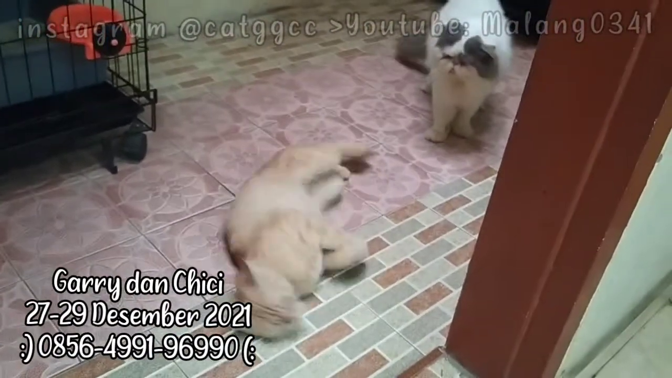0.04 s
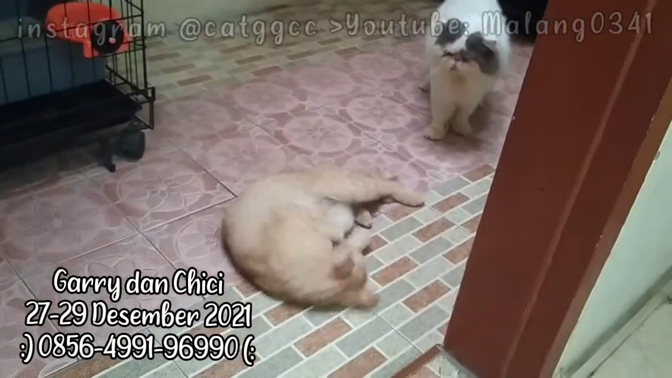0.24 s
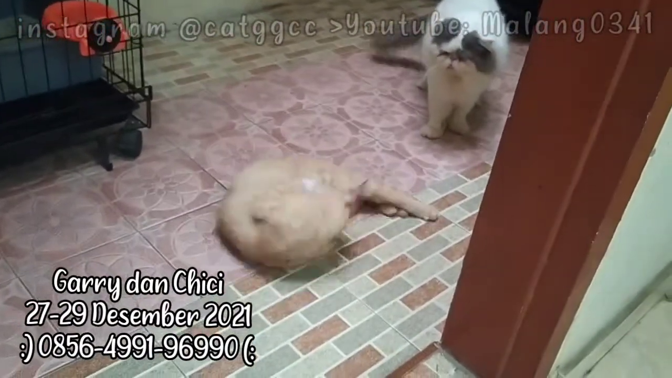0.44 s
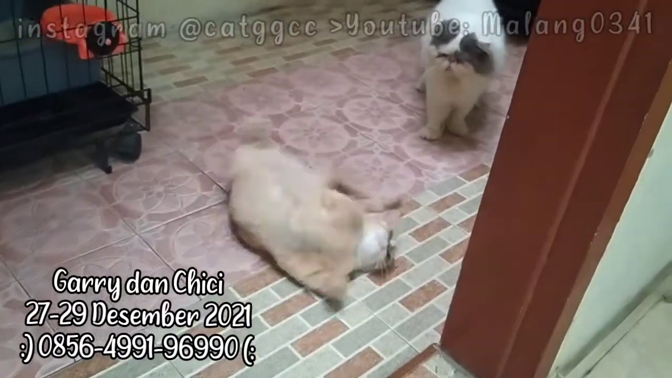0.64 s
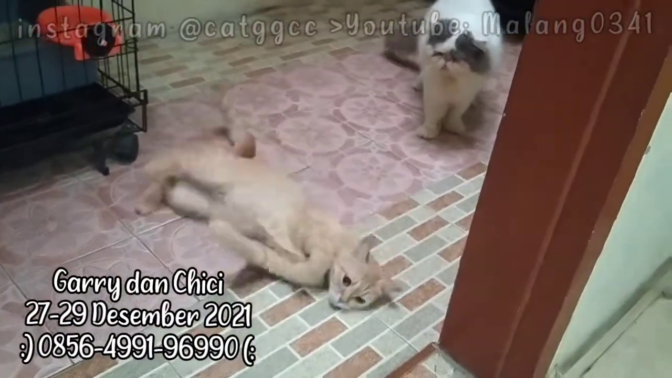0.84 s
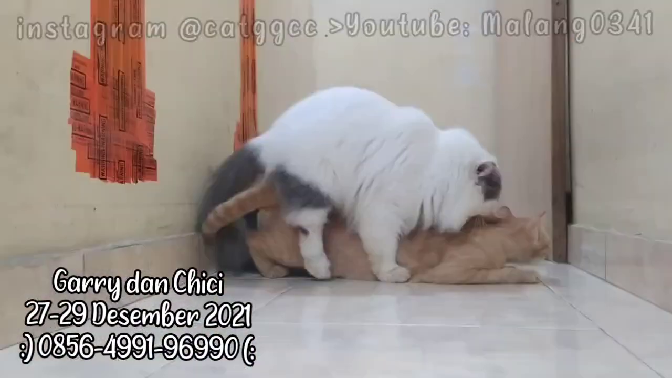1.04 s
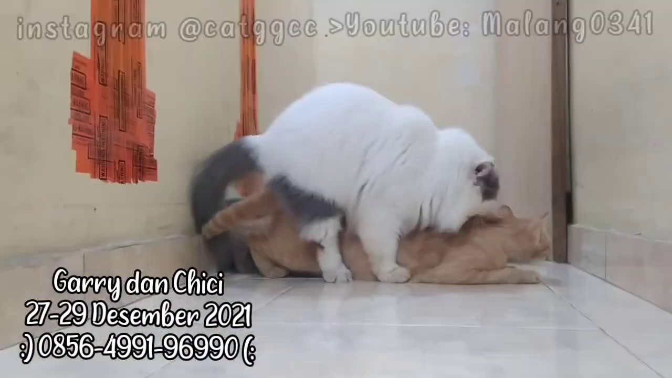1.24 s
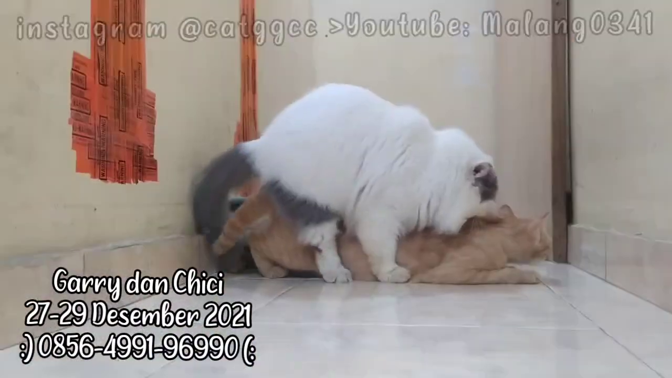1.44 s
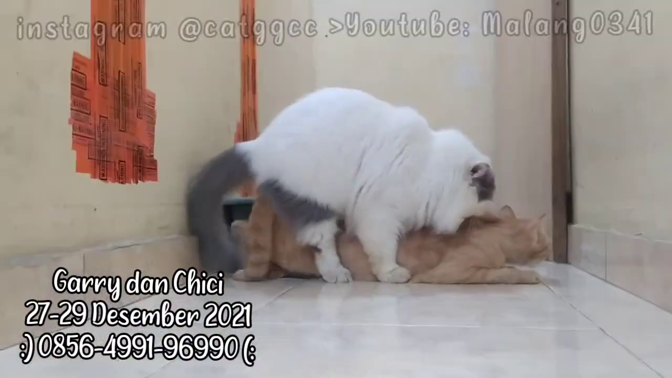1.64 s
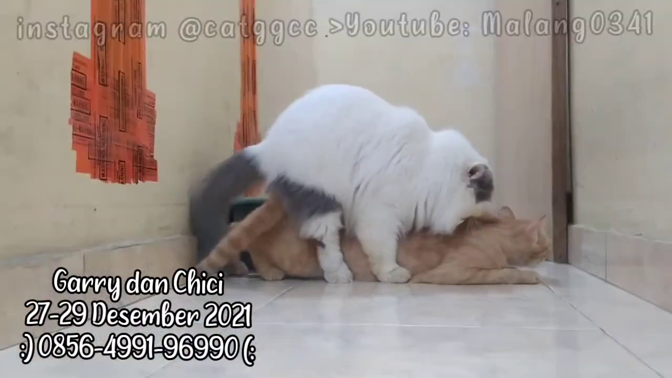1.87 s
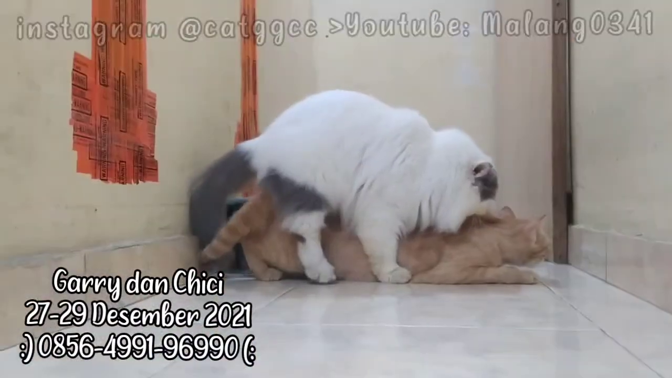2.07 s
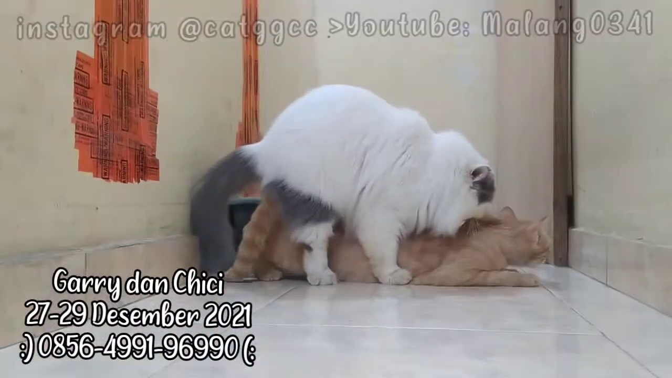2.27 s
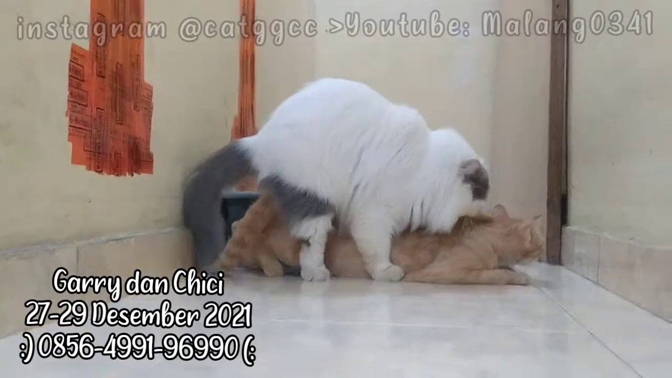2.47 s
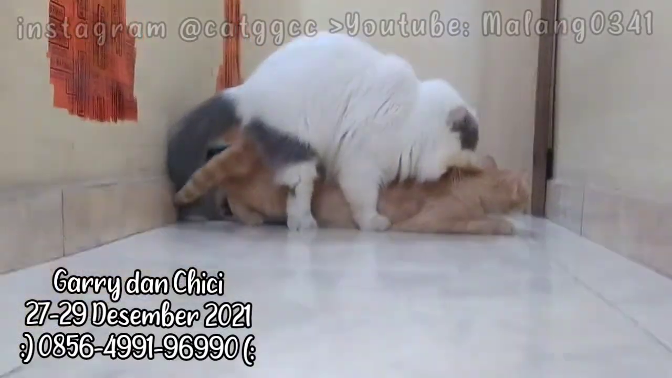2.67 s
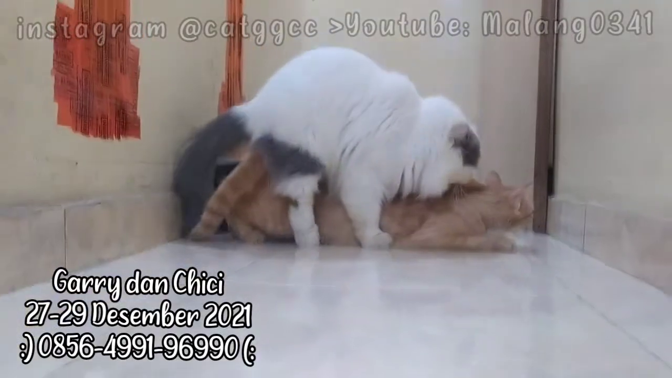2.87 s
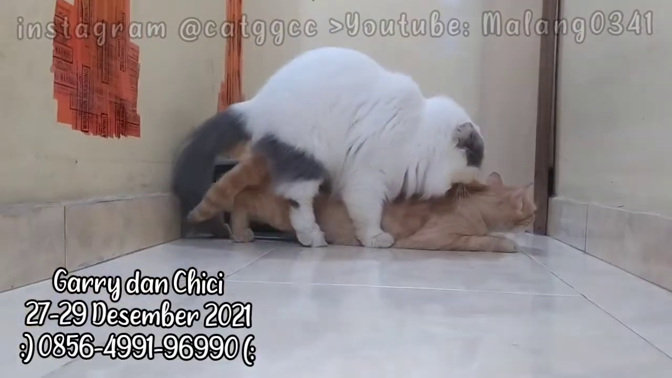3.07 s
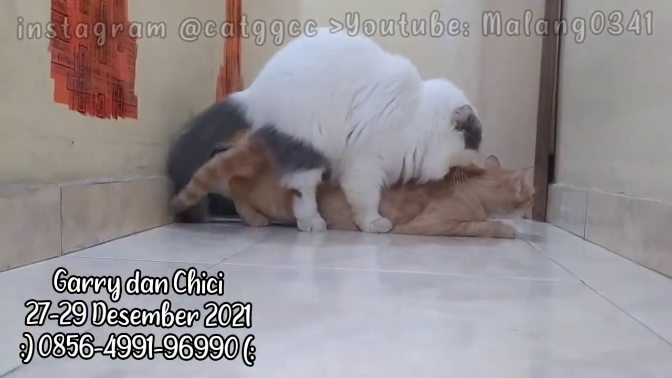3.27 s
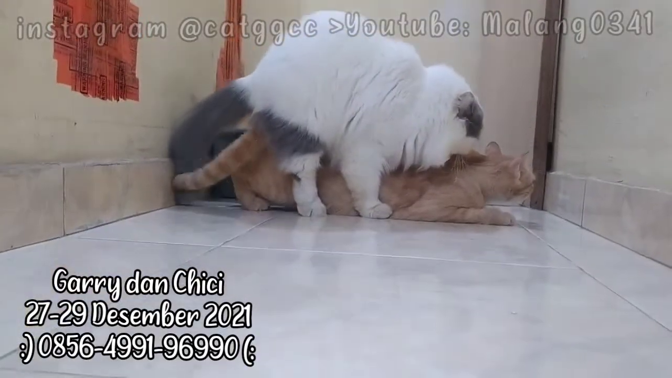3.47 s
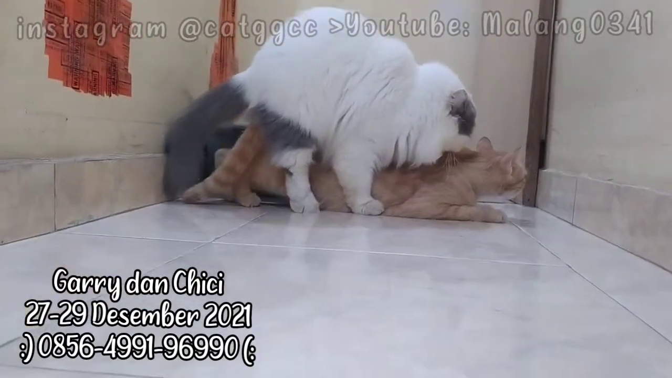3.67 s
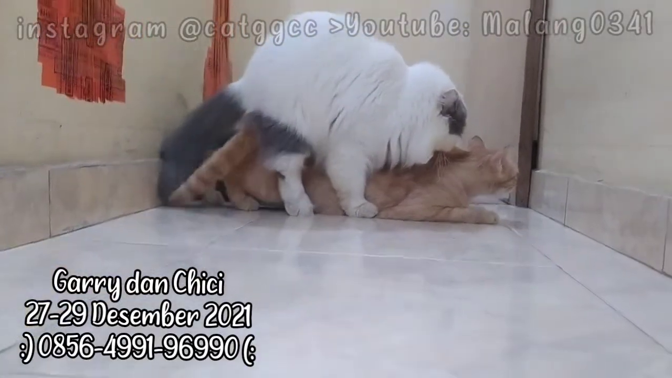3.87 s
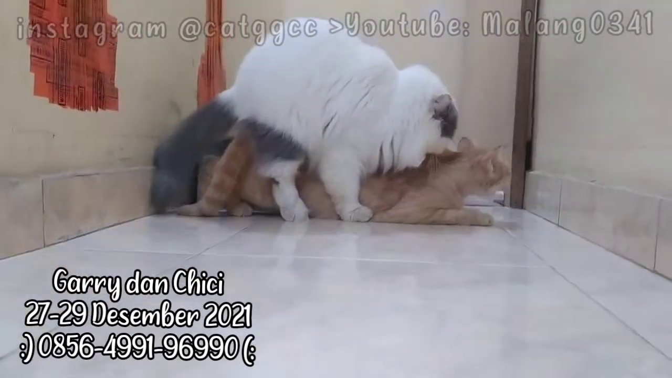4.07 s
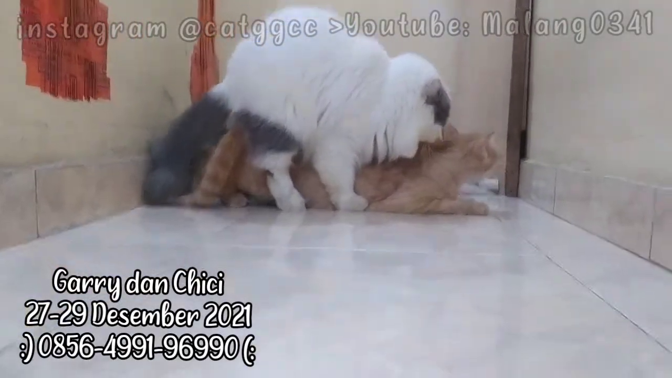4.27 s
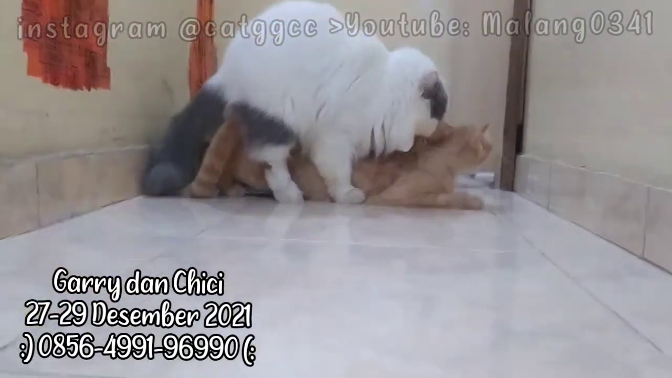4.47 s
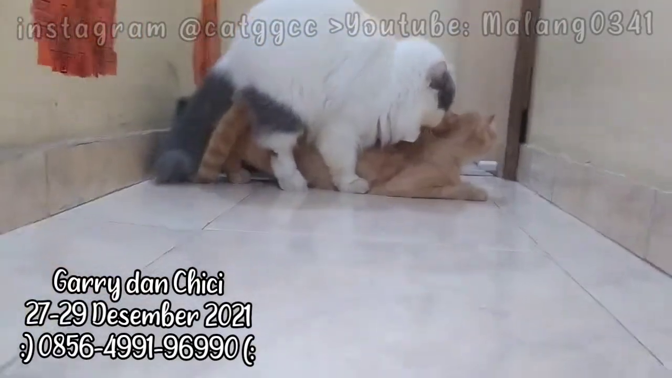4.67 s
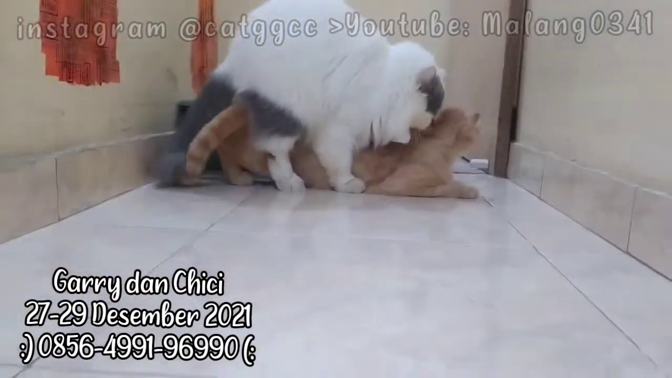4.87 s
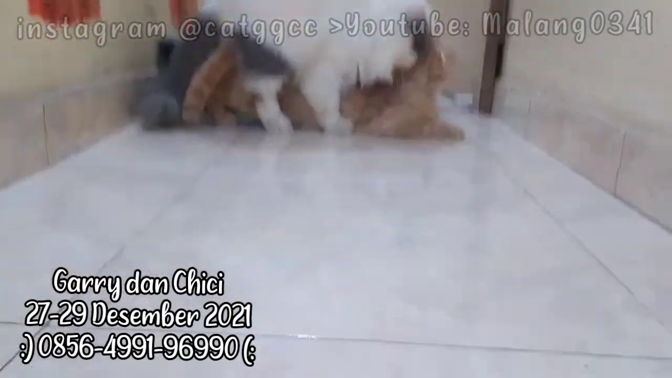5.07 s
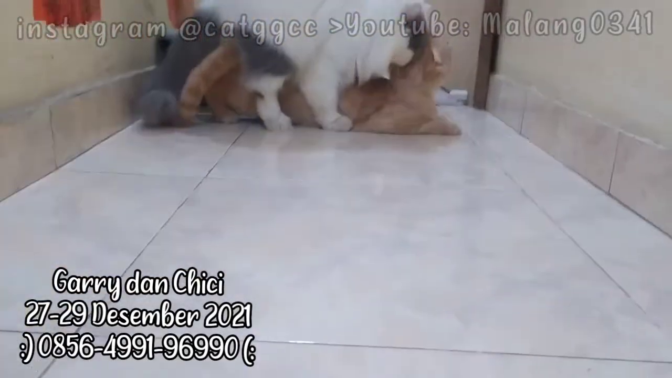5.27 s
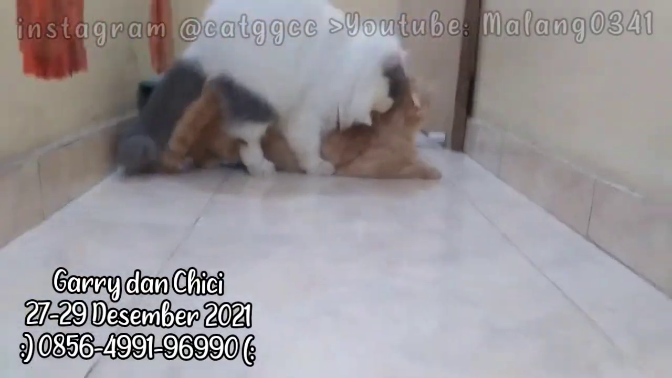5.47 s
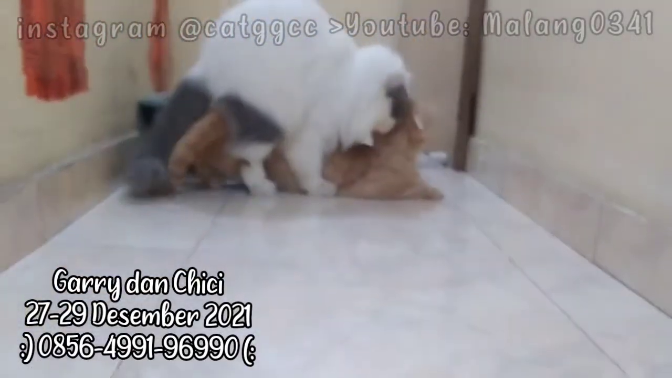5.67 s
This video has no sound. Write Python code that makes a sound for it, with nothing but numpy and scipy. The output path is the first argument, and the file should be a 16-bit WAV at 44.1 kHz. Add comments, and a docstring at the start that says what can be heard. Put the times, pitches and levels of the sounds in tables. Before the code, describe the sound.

From 0 to 0.87 s, a distant wavering low drone fills a room, with soft fur brushes of a cat rolling on the floor and a thin, far mew around 0.1-0.4 s. The sound dips almost to silence, then cuts to a quieter tiled corner. At 0.9 s comes a short, rough growl fading by 1.2 s, with faint claw ticks. From 1.7 to 3.7 s a low, closed-mouth moan wavers, quickening slightly, sinking in pitch and breaking into gravelly roughness before fading; a sharper claw tick lands near 2.4 s. Fur scuffs and ticks increase from 3.2 s, with a dull soft floor bump near 3.7 s. At 4.0 s a scream starts noisy and tight, swoops up over half a second as the mouth opens, and holds very loud, harsh and two-toned, quavering early, until the cut at about 5.7 s. Close walls echo brightly.

```python
"""A cat pinned by another in a tiled corner: a short growl, a long low moan, then a loud scream.
The moan is soft fold pulses that keep breaking into roughness; the scream is two coupled, rasping
oscillators. Both pass moving throat filters and reach the two microphones with close wall echoes.
Filtered noise makes fur and claws scuffing on tile, and dull floor bumps. It opens in another room,
with a distant drone, a thin far mew and a cat rolling on the floor; the level dips, then the corner."""
import sys
import numpy as np
from scipy import signal
from scipy.fft import rfft, irfft, next_fast_len
from scipy.io import wavfile
from scipy.ndimage import uniform_filter1d, map_coordinates

SR = 44100
rng = np.random.default_rng(int(sys.argv[2]) if len(sys.argv) > 2 else 0)


def wav_record(signal):
    """Record a signal, one row per channel, as 16-bit PCM in the file named by sys.argv[1]."""
    frames = np.transpose(np.atleast_2d(signal))
    bounded = np.clip(frames, -1, 1)
    # unit amplitude maps onto the largest positive 16-bit level
    quanta = np.round(bounded * 32767).astype(np.int16)
    wavfile.write(sys.argv[1], SR, quanta)


N = 252252
TIME = np.arange(N) / SR


def gain_of(db):
    """Decibels to gain."""
    return 10 ** (np.asarray(db) / 20)


def evened(x):
    """Scales to rms 1."""
    return x / np.sqrt(np.mean(x ** 2) + 1e-20)


def read(points, hz):
    """Reads a spectrum on a log-frequency axis."""
    f, value = np.transpose(points)
    return np.interp(np.log(hz + 1), np.log(f + 1), value)


def follow(rows, t):
    """Reads every column of a curve at the times t."""
    s, *columns = np.transpose(rows)
    return [np.interp(t, s, c) for c in columns]


def add(mix, s, sound):
    """Mixes a sound in at time s."""
    part = mix[max(round(s * SR), 0):][:len(sound)]
    part += sound[:len(part)]


def colour(x, points):
    """Filters by a fixed spectrum."""
    length = x.shape[-1]
    size = next_fast_len(length + SR // 2)
    gain = gain_of(read(points, np.fft.rfftfreq(size, 1 / SR)))
    return irfft(rfft(x, size) * gain, size)[..., :length]


def wobble(t, rate_hz):
    """Random motion of rms 1 that weakens above the rate."""
    hz = np.fft.rfftfreq(N, 1 / SR)
    slowed = rfft(rng.standard_normal(N)) / np.hypot(1, (hz / rate_hz) ** 2)
    return evened(irfft(slowed)[:len(t)])


def cycles(t, hz, jitter, jitter_hz):
    """Phase of an oscillator whose period is unsteady."""
    return 2 * np.pi * np.cumsum(hz * (1 + jitter * wobble(t, jitter_hz))) / SR


def pulses(phase, count):
    """One sharp pulse a cycle, from equal harmonics."""
    return evened(sum(np.cos(k * phase) for k in range(1, count + 1)))


def throat(drive, t, shape):
    """Filters by a moving spectrum shape(Hz, s) in dB and holds the result at unit level."""
    hz, s, z = signal.stft(drive, SR, nperseg=1024, noverlap=768)
    shaped = z * gain_of(shape(hz[:, None], s + t[0]))
    x = signal.istft(shaped, SR, nperseg=1024, noverlap=768)[1][:len(t)]
    return x / np.sqrt(abs(uniform_filter1d(x ** 2, size=2600)) + 1e-12)


# The scream's slow course, under its quaver.
# Each row: time in seconds, main pitch in Hz, second oscillator in Hz.
SCREAM_COURSE = [(4.0, 411.8, 250.7), (4.13, 488.3, 305), (4.22, 600, 382.4), (4.35, 741.6, 450),
                 (4.52, 793.9, 463.7), (4.93, 770.8, 473.1), (5.3, 845.7, 468.7), (5.44, 787.5, 471)]
# The mouth and the two throat resonances it moves. Each row: time in seconds, opening 0-1,
# lower resonance in Hz, its height in dB, upper resonance in Hz, its height in dB.
MOUTH_COURSE = [(3.99, 0, 1000, 7, 2500, -9), (4.03, 0.04, 1324, 14.5, 2430, -2),
                (4.13, 0.02, 1510, 13, 2430, 12), (4.2, 0.6, 1830, 8.5, 2560, 7.5),
                (4.28, 0.73, 1850, 6, 2370, 7), (4.42, 0.92, 2040, 9.5, 2340, -5.5),
                (4.59, 0.9, 1850, 3, 2160, 6.5), (4.85, 0.92, 1850, 8.5, 2250, -1),
                (5.06, 0.88, 1510, 4.5, 2524, 6), (5.24, 1, 1860, -6.5, 2370, 6.5),
                (5.42, 0.97, 1790, 4, 2200, 4.5), (5.58, 0.99, 1845, 4.5, 2720, 7),
                (5.72, 0.96, 1930, 3.5, 2670, 4)]
# Throat with the mouth just parted. Each row: frequency in Hz, level in dB.
PARTED_SPECTRUM = [(100, -22), (190, 0.5), (290, 3.5), (480, -10), (850, 3), (1400, -3), (2000, -15),
                   (2900, -14), (3250, -57), (14000, -76)]
# Throat with the mouth wide open. Each row: frequency in Hz, level in dB.
OPEN_SPECTRUM = [(150, -11), (230, -39.5), (450, -21.5), (830, -16), (1330, -10), (1520, -9), (1750, -1.5),
                 (2050, -1), (2450, -6.5), (2850, -9.5), (3200, -17.5), (3650, -21.5), (4600, -31.5),
                 (7800, -29.5), (10200, -20.5), (11200, -34), (13500, -43.5), (15500, -82)]
# The sum tone, as the oscillators lock for a moment. Each row: time in seconds, level in dB.
SUM_TONE_COURSE = [(4.95, -14.5), (5.28, -6.5), (5.4, -19)]
# Surges of the lower oscillator that rob the main one of its clear tone: times in seconds.
SURGE_TIMES = [4.55, 4.79, 4.96, 5.06, 5.37, 5.57]
# half length of a surge, lift of the lower tone, dip of the main one
SURGE_S, SURGE_DB, ROBBED_DB = 0.047, 9.5, -7.5
SCREAM_START_S, SCREAM_ATTACK_S = 3.994, 0.032
FIRM_S = 0.355  # time the scream takes to firm up from its noisy start
COUPLE_S = 0.48  # time until the slower oscillator fully chops the main one
TEAR_DB = 2.6  # rms depth, mouth fully open, at which partials flare and drop out
STRETCH = 0.57  # resonances below 6 kHz shift upward (octaves per full opening)
REST_OPENING = .92  # the opening at which they are unshifted


def scream(jitter=.06, second_jitter=.08, start_jitter=.02, coupling=1.0, second_db=-10, air_db=-7,
           rasp=0.26, rasp_hz=90, main_db=-9.5, low_db=-27.0, width_hz=150):
    """Two oscillators: the slower chops the main pulses into sum and difference tones, with a rasp."""
    t = np.arange(SCREAM_START_S, N / SR, 1 / SR)
    age = t - t[0]
    hz, second_hz, rough, gain = scream_effort(t)
    coupled = np.minimum(age / COUPLE_S, 1) ** 4
    stumble = start_jitter * np.maximum(1 - age / FIRM_S, 0)
    main = cycles(t, hz, jitter * rough + stumble, jitter_hz=109.6)
    second = cycles(t, second_hz, second_jitter * rough + stumble, jitter_hz=108.5)

    overtones = pulses(second, count=20) - np.cos(second) / np.sqrt(10)  # without its fundamental
    chopped = pulses(main, count=14) * (1 + coupling * coupled * np.cos(second))
    folds = chopped + gain_of(second_db) * overtones
    # turbulence leaves in puffs, one a cycle, and is stronger in the treble
    puffs = rng.standard_normal(len(t)) * (1 + np.cos(second))
    air = colour(puffs, [(1000, 0.0), (2000, 14.0)])
    drive = (folds + gain_of(air_db) * rough * air) * np.exp(rasp * rough * wobble(t, rasp_hz))

    def shape(f, s):
        """Two resonances move with jaw and tongue over a throat that brightens as it opens; the rasp tears."""
        opening, lower_hz, lower_db, upper_hz, upper_db = follow(MOUTH_COURSE, s)
        shift_octaves = STRETCH * (opening - REST_OPENING) * (f < 6000)
        wide = read(OPEN_SPECTRUM, f / 2 ** shift_octaves)
        db = (1 - opening) * read(PARTED_SPECTRUM, f) + opening * wide
        for peak_hz, peak_db in (lower_hz, lower_db), (upper_hz, upper_db):
            db = db + peak_db / (1 + ((f - peak_hz) / width_hz) ** 2)
        return db + TEAR_DB * opening * tears(f, s, np.interp(s, t, hz))

    # both fundamentals ring clear, unsteadily, whenever the rasp eases
    opening = follow(MOUTH_COURSE, t)[0]
    eased = np.clip(2.2 - 3 * rough, 0, 1) * opening * (1 + 0.36 * wobble(t, rate_hz=13.5))
    surge = sum(np.exp(-((t - s) / SURGE_S) ** 2) for s in SURGE_TIMES)
    main_tone = gain_of(main_db + ROBBED_DB * surge) * np.cos(main)
    low_tone = gain_of(low_db) * (1 + gain_of(SURGE_DB) * surge) * np.cos(second)
    sum_tone = gain_of(follow(SUM_TONE_COURSE, t)[0]) * coupled * np.cos(main + second)
    clear = (main_tone + low_tone) * eased + sum_tone
    voice = colour(throat(drive, t, shape), [(100, -40), (150, 1.5)]) + np.sqrt(2) * clear
    return t[0], voice * gain


# quaver: its main crest (s), rate (Hz), pitch depth (share), time to settle either side (s)
QUAVER_CREST_S, QUAVER_HZ, QUAVER_DEPTH, QUAVER_SETTLE_S = 4.775, 3.77, 0.0456, 0.346
# roughness at the start, once firm, and its swing in the quaver (0-1)
START_ROUGH, FIRM_ROUGH, QUAVER_ROUGH = .95, .57, .08
# level with the lips just parted and with the mouth wide, and the opening at which it is full (0-1)
PARTED_DB, WIDE_DB, FULL_OPENING = -23, -11.5, 0.58


def scream_effort(t):
    """Pitches and roughness quaver together; the voice grows louder as the mouth opens, and firms up."""
    age = t - QUAVER_CREST_S
    quaver = np.cos(2 * np.pi * QUAVER_HZ * age) * np.exp(-(age / QUAVER_SETTLE_S) ** 2)
    hz, second_hz = np.array(follow(SCREAM_COURSE, t)) * (1 + QUAVER_DEPTH * quaver)
    effort = np.minimum(follow(MOUTH_COURSE, t)[0] / FULL_OPENING, 1)
    firm = np.minimum((t - t[0]) / FIRM_S, 1) ** 2
    rough = START_ROUGH + (FIRM_ROUGH - START_ROUGH) * firm + QUAVER_ROUGH * quaver
    attack = np.minimum((t - t[0]) / SCREAM_ATTACK_S, 1)
    gain = gain_of(PARTED_DB + (WIDE_DB - PARTED_DB) * effort) * attack
    return hz, second_hz, rough, gain


def tears(f, s, hz, size=7):
    """Random patches, narrow and brief, that ride up and down with the pitch hz."""
    narrow = uniform_filter1d(rng.standard_normal((len(f), len(s))), size=2, axis=0)
    field = evened(uniform_filter1d(narrow, size=size, axis=1))
    rows = np.arange(len(f))[:, None] * hz.min() / hz
    places = np.array(np.broadcast_arrays(rows, np.arange(len(s))))
    return map_coordinates(field, places, order=1)


# The moan's slow course, under its waver and sag.
# Each row: time in seconds, pitch in Hz, roughness 0-1, level in dB before the room.
MOAN_COURSE = [(1.693, 420, 0.49, -47), (1.744, 391, .12, -31.5), (1.814, 455.7, 0.32, -39.5),
               (1.901, 385, 0.08, -35), (2.0, 389.2, 0.13, -35), (2.125, 399.7, 0.29, -37.5),
               (2.168, 399, 0, -26.5), (2.225, 398.5, 0.04, -30), (2.305, 393.6, 0.28, -34.5),
               (2.35, 395.3, .12, -32.5), (2.531, 393, 0.25, -30.5), (2.601, 375.6, 0.26, -34),
               (2.709, 361, 0.07, -31.5), (2.745, 333, .68, -31.5), (2.811, 324, 0.6, -37),
               (2.86, 354, .08, -33.5), (2.96, 361, 0.15, -33), (3.0, 347, 0.54, -36),
               (3.088, 329.5, 0.76, -33), (3.179, 355.2, 0.41, -40), (3.25, 343, .4, -39),
               (3.34, 330.4, 0.51, -34.5), (3.42, 338.2, 0.34, -40.5), (3.495, 332.4, 0.61, -37.5),
               (3.559, 313.6, 0.67, -47.5), (3.65, 295.6, 0.59, -60.5)]
# The lips part and close, tilting the low harmonics. Each row: time in seconds, tilt in dB per octave.
LIP_TILT = [(1.745, 10.5), (1.85, 6.5), (1.99, 8.5), (2.09, 6), (2.18, 12), (2.42, 2.5), (2.53, 8.5),
            (2.78, 3), (2.92, -1), (3.02, 1), (3.32, -2.5), (3.5, -10.5)]
# Throat behind a nearly shut mouth. Each row: frequency in Hz, level in dB.
MOAN_SPECTRUM = [(130, -11.5), (290, -3.5), (420, 2), (830, -3.5), (1020, -16.5), (1230, -26),
                 (2300, -39.5), (2900, -31), (3500, -59), (4200, -38), (5200, -57), (6400, -38),
                 (8000, -59)]
MOAN_ATTACK_S, MOAN_RELEASE_S = 0.02, 0.057
# the moan wavers ever faster: a reference crest (s), rate there (Hz), quickening (Hz per s)
WAVER_CREST_S, WAVER_HZ, WAVER_HZ_PER_S = 1.86, 4.4, .84
# at each crest the throat tightens: pitch rises (share), level drops (dB), roughness eases (share)
TIGHT_RISE, TIGHT_DB, TIGHT_EASE = .07, -2.5, 0.304
ROUGH_SAG = .12  # share of the pitch lost when the folds turn fully rough


def moan():
    """A sinking moan; the throat tightens about five times a second, between which it sags and breaks."""
    t = np.arange(MOAN_COURSE[0][0], MOAN_COURSE[-1][0] + MOAN_RELEASE_S, 1 / SR)
    course_hz, rough, db = follow(MOAN_COURSE, t)
    age = t - WAVER_CREST_S
    tight = np.cos(np.pi * (WAVER_HZ * age + WAVER_HZ_PER_S * age ** 2 / 2)) ** 4
    rough = rough * (1 - TIGHT_EASE * tight)
    hz = course_hz * (1 + TIGHT_RISE * tight - ROUGH_SAG * rough)
    tilt = follow(LIP_TILT, t)[0]
    envelope = np.clip(np.minimum((t - t[0]) / MOAN_ATTACK_S, (t[-1] - t) / MOAN_RELEASE_S), 0, 1)
    voice = shut_voice(t, hz, rough, MOAN_SPECTRUM, tilt,
                       jitter=0.162, shimmer=0.5, flutter_hz=49.6, air_db=7.0)
    return t[0], voice * envelope * gain_of(db + TIGHT_DB * tight)


# The short growl. Each row: time in seconds, pitch in Hz, roughness 0-1, level in dB before the room.
GROWL_COURSE = [(.897, 290, .85, -37), (1.04, 300, .8, -42.5), (1.08, 295, .8, -53), (1.2, 290, .8, -61)]
# Throat during the growl. Each row: frequency in Hz, level in dB.
GROWL_SPECTRUM = [(130, -9), (270, 5.5), (500, -2.5), (750, -6), (1020, -3), (1200, -27), (1700, -35),
                  (4500, -53), (8000, -57)]


def growl(first_tilt_db=2, last_tilt_db=-7):
    """A short rough grumble whose low harmonics tilt darker as the lips close."""
    t = np.arange(GROWL_COURSE[0][0], GROWL_COURSE[-1][0], 1 / SR)
    hz, rough, db = follow(GROWL_COURSE, t)
    tilt = np.linspace(first_tilt_db, last_tilt_db, len(t))  # dB per octave
    voice = shut_voice(t, hz, rough, GROWL_SPECTRUM, tilt,
                       jitter=0.17, shimmer=0.91, flutter_hz=67.5, air_db=9.0)
    return t[0], gain_of(db) * voice


def shut_voice(t, hz, rough, spectrum, tilt, jitter, shimmer, flutter_hz, air_db):
    """Mouth nearly shut: soft fold pulses that stumble in period and strength when rough, plus air."""
    phase = cycles(t, hz, 0.0088 + jitter * rough, flutter_hz)
    folds = pulses(phase, count=3) * (1 + shimmer * rough * wobble(t, flutter_hz))
    puffs = (1 + np.cos(phase)) * rng.standard_normal(len(t))
    air = colour(puffs, [(300, -13), (720, -10), (1350, 6.5)])

    def shape(f, s):
        """The throat spectrum, tilted between 300 and 800 Hz."""
        return read(spectrum, f) + np.interp(s, t, tilt) * np.log2(np.clip(f, 300, 800) / 800)

    return throat(folds + gain_of(air_db) * (.5 + rough) * air, t, shape)


def room(x, wet_db, left_db, count=12):
    """The cat faces the wall: her treble arrives mostly as echoes that shift as her head moves."""
    wet = [(900, wet_db), (1700, wet_db + 15.5)]  # (Hz, dB of echo against direct sound)
    place = TIME / TIME[-1] * (count - 1)
    thrown, both = colour(x, wet), np.array([x, x])
    for k in range(count):  # crossfade through successive echo patterns
        near = abs(place - k) < 1
        piece = thrown[near] * np.cos(np.pi / 2 * (place[near] - k))
        for channel, tail in zip(both, echoes()):
            add(channel, TIME[near][0], signal.fftconvolve(piece, tail))
    # direct and echoed power together stay level across the spectrum
    balance = [(f, -10 * np.log10(1 + gain_of(db) ** 2)) for f, db in wet]
    return colour(both, balance) * gain_of([[left_db / 2], [-left_db / 2]])


# How long the tiled room rings. Each row: frequency in Hz, time to fall 60 dB in seconds.
ROOM_DECAY = [(250, 0.75), (1000, 0.42), (10000, 0.34)]


def echoes(early=0.79, early_s=0.036):
    """Stronger early echoes from the close walls and a tail that dies band by band."""
    taps = pair(rng.standard_normal((2, SR // 2)))
    hz, t, z = signal.stft(taps, SR, nperseg=256)
    z = z * gain_of(-60 * t / read(ROOM_DECAY, hz)[:, None]) * (1 + early * np.exp(-t / early_s))
    tail = signal.istft(z, SR, nperseg=256)[1]
    return tail / np.linalg.norm(tail, axis=1, keepdims=True)


# Likeness of the two microphones in a diffuse field. Each row: frequency in Hz, likeness 0-1.
MICROPHONE_LIKENESS = [(150, 0.82), (800, 0.039), (1300, 0), (2000, 0)]


def pair(x):
    """Two unrelated channels become a diffuse field at two microphones: alike only in the bass."""
    z = rfft(x)
    same = np.clip(read(MICROPHONE_LIKENESS, np.fft.rfftfreq(x.shape[1], 1 / SR)), -1, 1)
    return irfft([z[0], same * z[0] + np.sqrt(1 - same ** 2) * z[1]], x.shape[1])


# Claw ticks on tile. Each row: time in seconds, peak in dB before the room,
# brightness in dB per octave, decay in seconds.
CLAW_TICKS = [(1.185, -43, 16, 0.00027), (1.298, -47.5, -0.5, 0.0017), (1.7, -42.5, 7, 0.0016),
              (2.4063, -36, 11, .0005), (2.435, -27, -0.5, 0.00044), (3.231, -38, -1, .001),
              (3.309, -32.5, 10, 0.0022), (3.7457, -37, 7, .002)]
# Claw on tile. Each row: frequency in Hz, level in dB before each tick's brightness.
CLAW_SPECTRUM = [(300, -13), (1300, 12.5), (3000, 3), (6500, -6), (9200, 3), (11500, -9), (15000, -27)]


def claws():
    """Small dry ticks: noise with a sharp start and a scrape that dies within milliseconds."""
    out, t = np.zeros(N), np.arange(1024) / SR - .005
    for s, db, tilt, decay_s in CLAW_TICKS:
        burst = rng.standard_normal(len(t)) * np.exp(np.minimum(t / .0002, -t / decay_s))
        spectrum = [(f, level + tilt * np.log2(min(f, 9000))) for f, level in CLAW_SPECTRUM]
        tick = colour(burst, spectrum)
        add(out, s + t[0], gain_of(db) * tick / abs(tick).max())
    return out


# Fur on tile. Each row: frequency in Hz, level in dB.
SCUFF_SPECTRUM = [(300, 5), (1200, -3), (2700, -0.5), (4500, -5.5), (7500, -3), (9300, 3), (11000, -4.5),
                  (13000, -18), (15500, -23)]


def scuffs(level_db=0, grain_db=1.5):
    """Fur dragging over tile: fine grains of friction under each movement."""
    flicker = evened(uniform_filter1d(rng.standard_normal(N), size=60))
    grains = rng.standard_normal((2, N)) * gain_of(grain_db * flicker)
    return evened(colour(pair(grains), SCUFF_SPECTRUM)) * gain_of(level_db) * rubbing()


# Rubs of fur. Each row: time of the peak in seconds, length in seconds, peak in dB before the scuff level.
FUR_RUBS = [(0.15, 0.17, -57.5), (0.356, .08, -57), (0.497, 0.095, -60), (0.78, 0.23, -55),
            (1.718, 0.19, -60), (2.602, 0.14, -52.5), (3.308, 0.057, -48), (3.443, 0.18, -44.5),
            (3.746, 0.14, -46.5), (4.044, 0.079, -37), (4.168, 0.29, -39)]
# Steady shifting of fur. Each row: time in seconds, level in dB before the scuff level.
FUR_RUSTLE = [(0, -62.5), (1.5, -69.5), (2.5, -58.5), (3.15, -58), (3.65, -58.5), (4.0, -56.5)]
RUB_RISE_SHARE, RUB_EDGE_DB = 0.33, -11.5  # part of a rub before its peak; its two ends against the peak


def rubbing():
    """Strength of the friction: each rub swells and dies away over the steady rustle."""
    power = gain_of(follow(FUR_RUSTLE, TIME)[0]) ** 2
    for s, length, db in FUR_RUBS:
        before, after = (s - TIME) / RUB_RISE_SHARE, (TIME - s) / (1 - RUB_RISE_SHARE)
        away = np.maximum(before, after) / length
        power = power + gain_of(db + RUB_EDGE_DB * np.minimum(away, 20)) ** 2
    return np.sqrt(power)


# Soft bumps of a body on the floor. Each row: time in seconds, level in dB.
FLOOR_BUMPS = [(3.683, -49.5), (3.766, -59)]
# The floor's thud. Each row: frequency in Hz, level in dB.
BUMP_SPECTRUM = [(50, -18), (110, -2), (180, -2), (300, -25), (900, -51)]
BUMP_RISE_S = 0.015  # time to the peak of the envelope


def bumps():
    """Dull pushes of low noise on the tiles as the cats shift their weight."""
    out, u = np.zeros(N), np.arange(SR // 5) / SR / BUMP_RISE_S
    for s, db in FLOOR_BUMPS:
        thud = evened(colour(rng.standard_normal(len(u)), BUMP_SPECTRUM))
        add(out, s, gain_of(db) * u * np.exp(1 - u) * thud)
    return out


# Distant drone in the first room. Each row: frequency in Hz, level in dB per Hz.
DRONE_SPECTRUM = [(15, -42), (25, -1), (155, -4.5), (274, -5.5), (358, -18.5), (573, -15), (717, -21.5),
                  (1590, -25.5), (3330, -36), (4330, -67), (7330, -120)]
# Rise and fall of drone and hum. Each row: time in seconds, level in dB.
DRONE_COURSE = [(0, 3.5), (.3, -1.5), (.48, -2), (.56, 1.5), (.66, -2.5)]
# A thin far mew. Each row: time in seconds, pitch in Hz, level in dB before its partials are evened.
MEW_COURSE = [(.1, 507, -74), (.17, 514, -67), (.3, 541, -76), (.37, 510, -68)]
# Quiet air of the corner. Each row: frequency in Hz, level in dB per Hz.
QUIET_SPECTRUM = [(25, 0), (55, -10), (82, 1.5), (125, -9.5), (240, -7), (380, -19.5), (1200, -31),
                  (2800, -31.5), (5000, -54)]
# The dip between the two rooms: its start and end in seconds.
ROOM_GAP = (.868, .897)
DRONE_DB, QUIET_DB = -53, -59


def background(hum_hz=155, hum_db=-58, waver=0.059, upper_db=-6):
    """A distant wavering drone and a far mew in the first room, then the quieter air of the corner."""
    air = pair(rng.standard_normal((2, N)))
    hum = gain_of(hum_db) * evened(np.sin(cycles(TIME, hum_hz, waver, jitter_hz=12)))
    rumble = gain_of(DRONE_DB) * evened(colour(air, DRONE_SPECTRUM))
    drone = (rumble + hum) * gain_of(follow(DRONE_COURSE, TIME)[0])
    mew_hz, mew_db = follow(MEW_COURSE, TIME)
    far = cycles(TIME, mew_hz, 0.014, jitter_hz=80)
    partials = np.sin(3 * far) + gain_of(upper_db) * np.sin(4 * far)  # only the third and fourth carry
    calling = (TIME > MEW_COURSE[0][0]) * (TIME < MEW_COURSE[-1][0])
    mew = gain_of(mew_db) * evened(partials) * calling
    quiet = gain_of(QUIET_DB) * evened(colour(air, QUIET_SPECTRUM))
    return np.where(TIME < ROOM_GAP[0], drone + mew, quiet)


def scene():
    """The cat's calls and movements in the room, over the background."""
    low, loud = np.zeros(N), np.zeros(N)
    add(loud, *scream())
    add(low, *moan())
    add(low, *growl())
    calls = gain_of(-1.43) * room(loud, wet_db=-1.5, left_db=0.33, count=16)
    calls = calls + gain_of(-2.24) * room(low, wet_db=-1.5, left_db=2.5)
    ticks = room(claws(), wet_db=-14.5, left_db=-5.0, count=2)
    return calls + ticks + scuffs(level_db=-2.0) + bumps() + background()


EDGE_HZ = 15600  # upper band limit


def record(dry):
    """A brief 40 dB dip between the two rooms, soft overload and the band limit."""
    playing = uniform_filter1d(1. * ((TIME < ROOM_GAP[0]) | (TIME > ROOM_GAP[1])), size=60)
    x = dry * np.maximum(playing, .01)
    x = x / (1 + x ** 8) ** (1 / 8)
    lowpass = signal.firwin(511, EDGE_HZ, window=("kaiser", 9), fs=SR)
    return signal.oaconvolve(x, lowpass[None], "same")


dry = scene()
out = record(dry)
wav_record(out)
```